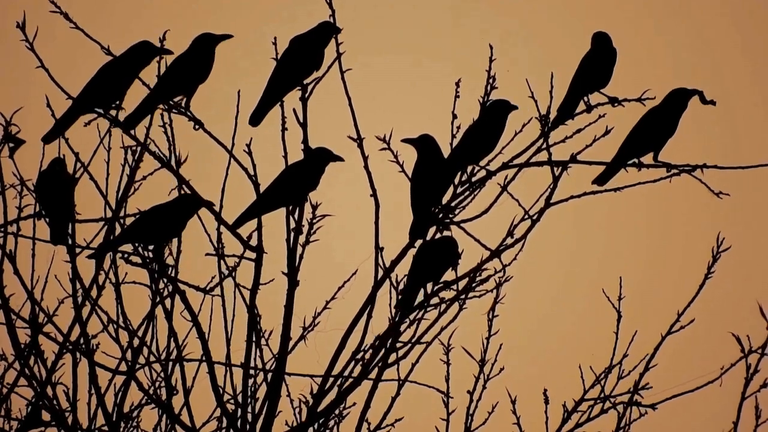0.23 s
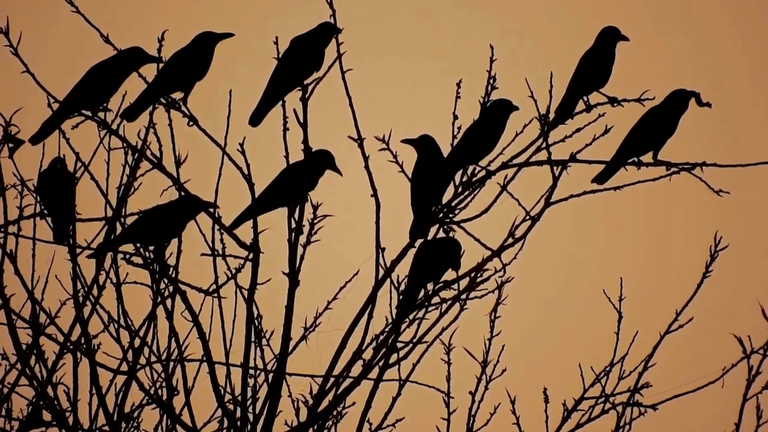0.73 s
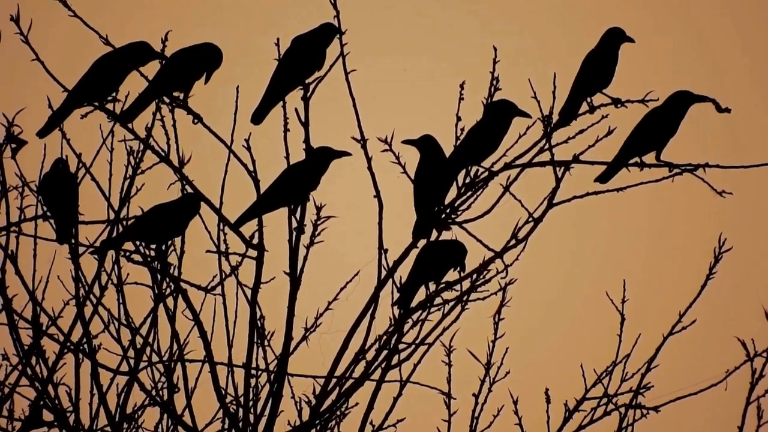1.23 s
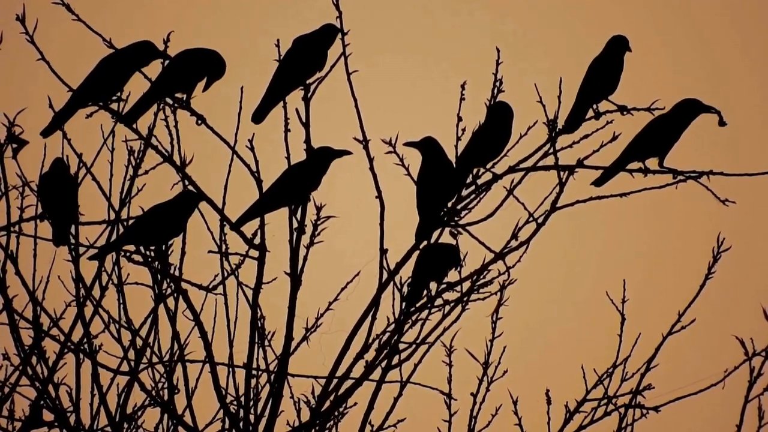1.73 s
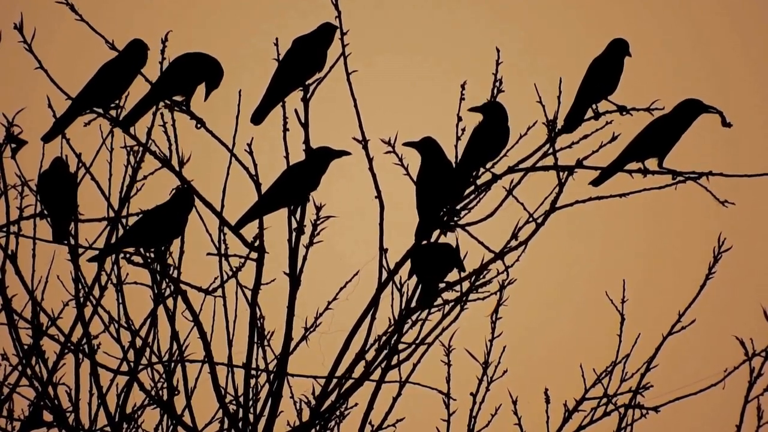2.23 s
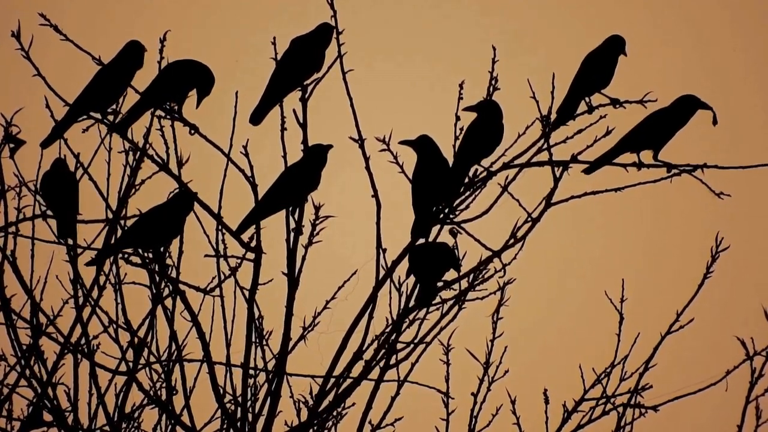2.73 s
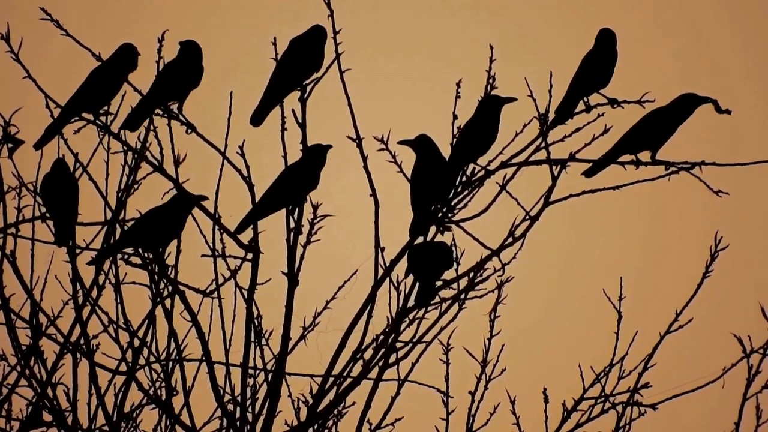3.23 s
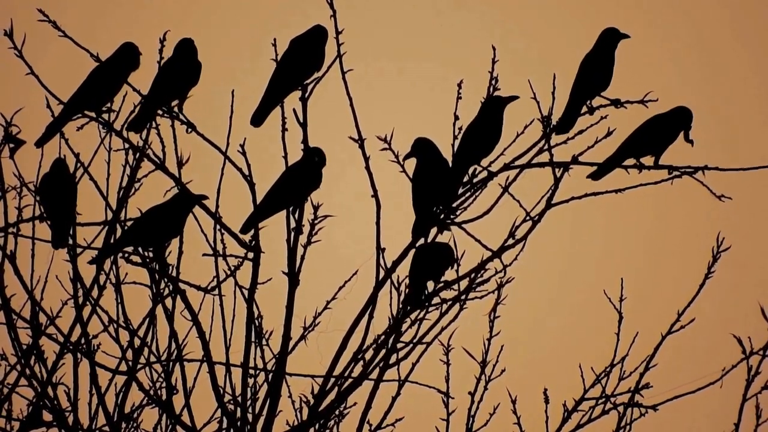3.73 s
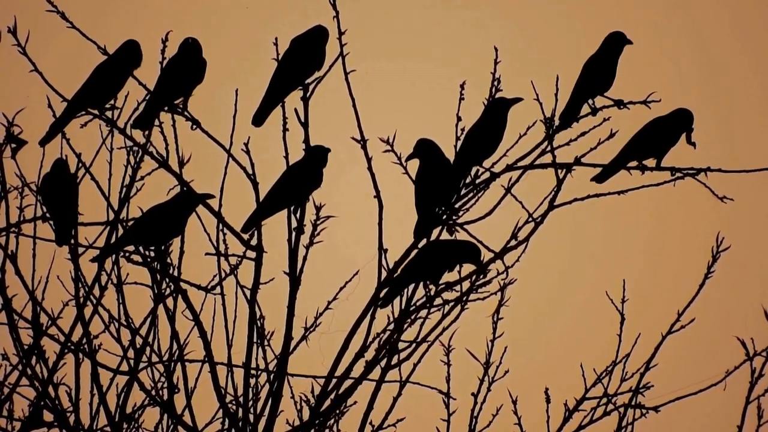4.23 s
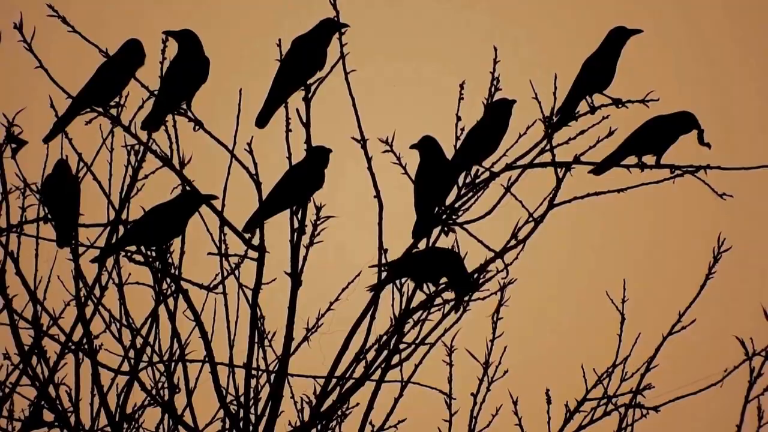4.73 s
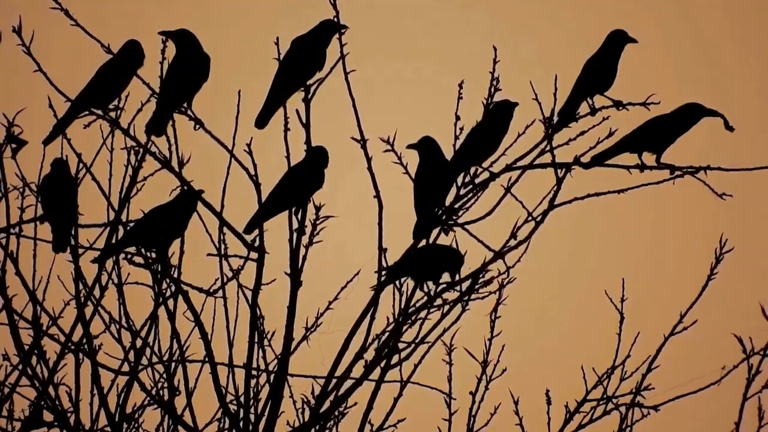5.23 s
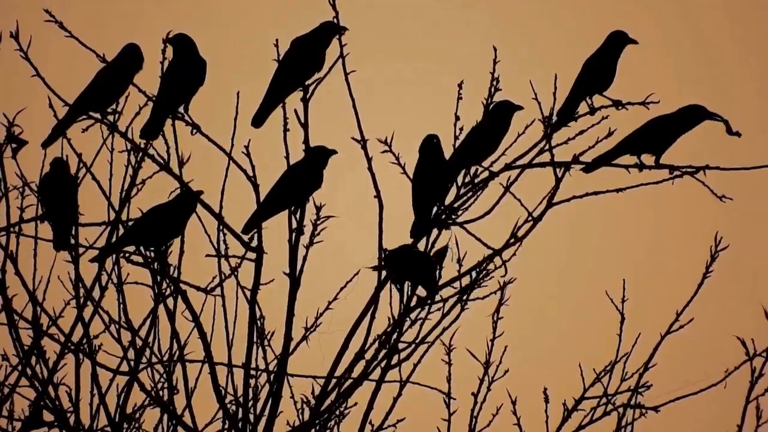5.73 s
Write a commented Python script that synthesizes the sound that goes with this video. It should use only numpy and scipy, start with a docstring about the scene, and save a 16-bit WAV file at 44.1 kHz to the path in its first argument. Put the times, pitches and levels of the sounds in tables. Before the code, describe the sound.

A flock of crows caws hoarsely in dense overlapping chorus outdoors, near calls over a babble of distant ones, with brief thin squeals midway.

```python
"""Among trees, a flock of crows caws: hoarse, overlapping near calls over a babble of far ones and a faint hiss.
Each caw is an uneven pulse train on an arched pitch, rung through a throat that opens and closes.
Two short, clear yelps cut in near the start, dry rattles click, and midway one bird gives thin gliding squeals.
The ground sends back one quick copy of the near calls; the trees answer with a short, dull echo."""
import sys
import numpy as np
from scipy import signal
from scipy.fft import rfft, irfft, next_fast_len
from scipy.io import wavfile
from scipy.ndimage import map_coordinates

SR = 44100
rng = np.random.default_rng(int(sys.argv[2]) if len(sys.argv) > 2 else 0)


def dump(signal):
    """Clip the signal to [-1, 1] and save it as 16-bit WAV at the path in sys.argv[1]."""
    limited = np.clip(np.atleast_2d(signal).T, -1, 1)
    pcm = np.round(limited * 32767).astype(np.int16)
    wavfile.write(sys.argv[1], SR, pcm)


N = 263718  # samples

# near caws: (start t/s, length t/s, level/dB before its course, pitch f/Hz before its arch, share of pitch lost,
# roughness 0-1, attack t/s, main resonance f/Hz, second resonance f/Hz, its ratio with the beak closed,
# its lift level/dB, high resonance f/Hz, its lift level/dB, treble level/dB)
NEAR_CAWS = [ (-.08, .33, -39, 375.2, .2, 0.46, .024, 1610, 3020, 0.87, 11.5, 6750, 5, 5.5),
             (.173, 0.18, -43, 340, 0.098, 0.32, 0.02, 1470, 2950, 1, 7, 6500, -2, -11),
             (.395, 0.047, -51, 350, 0.08, 0.5, 0.012, 1130, 3000, 1.1, 18.5, 6000, 4, -7),
             (0.577, 0.33, -35.5, 362, 0.057, 0.38, 0.047, 1565, 2990, 1.1, 14, 6430, 6.5, -2),
             (0.78, 0.26, -38.5, 408, 0.17, 0.39, 0.1, 1800, 3250, 0.63, 13.5, 6900, 6.5, -3),
             (0.928, .22, -41.5, 338.3, 0.19, 0.37, 0.013, 1400, 3000, 2.1, 10, 6500, 5, -2),
             (1.287, .25, -33.5, 400, .12, .42, 0.039, 1736, 3370, 1.13, 10.5, 6260, 4.5, 13),
             (1.5, .24, -40, 369, .17, 0.47, 0.034, 1585, 3167, .73, 6, 6550, 6, -1),
             (1.67, .22, -39.5, 401, .12, 0.49, 0.015, 1540, 3040, 1, 6, 6540, 7, -4),
             (1.83, 0.29, -40, 375.7, 0.14, 0.37, 0.009, 1400, 2900, 1.1, 6.5, 6450, 9.5, -4.5),
             (2.061, 0.22, -36, 394, 0.11, 0.46, .02, 1455, 2930, 1.06, 9, 6900, 12, -5),
             (2.18, .29, -40.5, 336.7, .18, 0.35, 0.018, 1480, 3100, 0.6, -12, 6550, 9, -2),
             (2.419, 0.27, -34.5, 369.4, .13, 0.49, 0.075, 1450, 3020, 0.78, 6, 6550, 6, 1),
             (2.556, 0.35, -36, 406, 0.2, .6, 0.041, 1810, 3240, 0.88, 6.5, 6900, 3, 6.5),
             (2.714, 0.43, -35.5, 372.6, .18, 0.51, .014, 1636, 3040, 0.97, 6.5, 6300, 7, 1),
             (2.959, 0.28, -38, 378.7, 0.17, .4, .04, 1550, 3020, 1.6, 10, 6600, -1, 3.5),
             (3.231, .19, -49.5, 344.6, 0.13, 0.23, 0.015, 1490, 2900, .92, -7, 6500, 0, 5),
             (3.42, 0.18, -43, 412, 0.057, 0.39, .015, 1344, 3060, .85, 11, 6400, 1, -10),
             (3.636, .15, -43.5, 401.7, 0.089, 0.34, 0.035, 1500, 3240, 0.87, 7, 6700, 0, -8),
             (3.718, 0.3, -40, 330.2, 0.15, 0.34, 0.0067, 1340, 3170, .95, 4, 6340, 7.5, -6),
             (3.962, .34, -40.5, 340.4, .14, .4, .035, 1440, 3370, 0.98, 9, 6500, 7, -1),
             (4.196, 0.26, -45, 331.6, 0.17, 0.44, 0.054, 1400, 3280, .7, 1, 6300, 7.5, -2),
             (4.423, 0.059, -51, 340, 0.094, 0.26, .012, 1200, 2740, 0.93, 22.5, 6100, 0, -9),
             (4.511, 0.034, -37.5, 332, 0.11, 0.39, 0.0074, 1330, 2930, 1.1, 5, 6500, 8, -9),
             (4.555, .2, -34, 353.3, .16, .4, .002, 1450, 2900, 1.1, 7.5, 6660, 11.5, -4.5),
             (4.997, 0.3, -42.5, 452.5, .18, 0.45, 0.023, 1600, 3220, 1.2, 11, 7030, 10.5, -0.5),
             (5.209, .22, -41.5, 424.3, 0.18, 0.44, 0.027, 1540, 2980, 1.03, 9.5, 7340, 7, 2),
             (5.475, 0.082, -50.5, 398, 0.055, 0.43, .008, 1950, 3300, 1.1, 7, 7100, -4, 4),
             (5.5, 0.36, -43.5, 391.7, 0.15, 0.54, 0.048, 1830, 3310, 1.14, 12, 7000, 1.5, 3),
             (5.656, 0.27, -43, 338.6, 0.11, 0.42, 0.008, 1400, 2940, 1.2, 11.5, 6450, 1, -9)]
# two short clear yelps: (start t/s, length t/s, level/dB before its course, pitch f/Hz before its bend,
# treble level/dB)
YELPS = [(0.115, 0.055, -35.5, 745, -9), (0.47, .088, -36, 747.4, -1)]
YELP_ROUGH, YELP_FALL, YELP_ATTACK_S = 0.12, 0.055, 0.014
# a yelp's throat: (second resonance f/Hz, its ratio with the beak closed, its lift level/dB,
# high resonance f/Hz, its lift level/dB)
YELP_THROAT = (2400, 1.5, -3, 6650, 18.5)
# the course of every caw: (share of its length, pitch ratio, relative level/dB, beak opening 0-1)
CALL_COURSE = [ (0, .86, -2, 0), (.1, .935, -.5, .45), (.32, 1.01, 0, 1), (.58, 1, 0, 1),
               (.82, .95, -2, .7), (1, .88, -5, .1)]
# colour of the voice beneath its resonances: (f/Hz, relative level/dB per Hz)
THROAT_COLOUR = [(200, -60.5), (330, -43), (520, -6.5), (720, -2), (1000, -2), (1400, 1.5), (2030, 3.5),
                 (2500, -5), (3250, -6.5), (3950, -15), (5400, -18), (7500, -19.5), (10500, -32),
                 (13500, -50)]
HIGH_CLOSED = 0.86  # ratio of the high resonance with the beak closed
# dry rattles, where a voice catches in single clicks: (start t/s, length t/s, level/dB before scatter and colour)
RATTLES = [(1.29, .035, -53), (2.416, .19, -58), (5.004, .012, -62)]
# tone of the rattle clicks: (f/Hz, level/dB)
RATTLE_COLOUR = [(400, -30), (800, -2), (1500, 6), (2500, 3), (4000, 0), (6000, 0.5), (9500, -4.5),
                 (13500, -18), (16000, -28)]
# squeals: (start t/s, length t/s, level/dB before its shake, first f/Hz, last f/Hz,
# bend of the glide (1 straight, more = late), lower octave relative level/dB before its fade)
SQUEALS = [ (3.048, 0.062, -50.5, 2400, 3073, 0.76, 15.5), (3.105, 0.12, -46, 3417, 3460, 0.82, 5.5),
           (3.204, .063, -46, 2927, 1865, 2.33, 10), (3.361, 0.027, -45.5, 2870, 2435, 0.31, -22),
           (3.437, 0.053, -43, 2030, 2117, 0.35, -25), (3.618, 0.063, -43, 1590, 1735, 1.85, -24),
           (3.655, 0.017, -40.5, 2120, 1900, .77, -21)]
# a squeal's lower octave fades out as it sinks from 1380 to 1100 Hz: (f/Hz, share)
LOWER_OCTAVE_FADE = [(1100, 0.028), (1380, 1)]
# swell of the far birds: (t/s, level/dB before the flock's overall lift)
FLOCK_LEVEL = [(0.0, -46.5), (0.33, -55), (.52, -52.5), (.7, -50.5), (1.01, -45.5), (1.18, -55),
               (1.5, -48.5), (1.65, -58.5), (1.9, -50.5), (2.83, -45), (3.3, -52.5), (3.6, -55),
               (3.8, -48.5), (4.33, -53.5), (4.53, -52), (4.75, -48.5), (4.95, -70.5), (5.08, -50),
               (5.47, -58), (5.73, -50), (5.93, -57), (5.98, -80)]
# echo among the trees, time to fall by 60 dB: (f/Hz, t/s)
TREE_DECAY = [(500, 1), (1500, 0.58), (3500, 0.63), (8000, 0.54), (14000, 0.61)]
# colour of the background hiss: (f/Hz, relative level/dB per Hz)
HISS_COLOUR = [(20, -32), (250, -18), (500, 1.5), (3000, 3.5), (8000, -3), (15500, -6)]
LOW_CUT_HZ, BAND_LIMIT_HZ = 396, 15708


def amp(db):
    """Decibels to gain."""
    return 10 ** (np.asarray(db) / 20)


def unit(x):
    """x at rms 1."""
    return x / np.sqrt(np.mean(x ** 2) + 1e-20)


def along(points, hz):
    """(Hz, value) points read on a log axis."""
    f, v = np.transpose(points)
    return np.interp(np.log(hz + 1), np.log(f + 1), v)


def curves(rows, at):
    """Each column after the first, read at the given places."""
    places, *columns = np.transpose(rows)
    return [np.interp(at, places, column) for column in columns]


def wobble(rate, size):
    """A smooth random curve, rate knots a second."""
    return map_coordinates(rng.standard_normal(1024), [np.arange(size) * rate / SR], mode="wrap")


def add(track, s, x):
    """Mix x into the track from time s, trimming what falls outside."""
    i = round(s * SR)
    part = x[max(-i, 0):max(len(track) - i, 0)]
    track[max(i, 0):max(i, 0) + len(part)] += part


def filtered(x, gain):
    """x times a gain that depends on frequency."""
    m = next_fast_len(N + SR // 2)
    return irfft(rfft(x, m) * gain(np.fft.rfftfreq(m, 1 / SR)), m)[:N]


def rung(x, colour_db, size=1024):
    """x through a causal filter with the given dB response."""
    cepstrum = irfft(np.log(amp(colour_db(np.fft.rfftfreq(size, 1 / SR))) + 1e-6))
    # folding the cepstrum onto positive time makes the filter minimum phase
    cepstrum[1:size // 2] *= 2
    cepstrum[size // 2 + 1:] = 0
    impulse = irfft(np.exp(rfft(cepstrum)))
    return signal.fftconvolve(x, impulse)[:len(x)]


def bump(hz, centre_hz, width_hz):
    """The bell shape of one resonance, 1 at its centre."""
    return np.exp(-.5 * ((hz - centre_hz) / width_hz) ** 2)


def near_crows():
    """The closest birds, each caw with its own throat; a yelp rings the throat at its second harmonic."""
    out = np.zeros(N)
    for s, length, db, *voice in NEAR_CAWS:
        add(out, s, amp(db) * caw(length, *voice))
    for s, length, db, pitch_hz, treble_db in YELPS:
        yelp = caw(length, pitch_hz, YELP_FALL, YELP_ROUGH, YELP_ATTACK_S, 2 * pitch_hz,
                   *YELP_THROAT, treble_db, closed=.98)
        add(out, s, amp(db) * yelp)
    return out


def caw(length, pitch_hz, fall, rough, attack_s, main_hz, second_hz, second_closed, second_db,
        high_hz, high_db, treble_db, main_db=16, clear_db=16, main_width_hz=290, second_width_hz=215,
        high_width_hz=400, closed=0.88, waver=0.0199, onset_db=12, count=7):
    """One call: the throat's three resonances move as the beak opens."""
    size = int(max(length, .025) * SR)
    u = np.linspace(0, 1, size)
    bend, level_db, opening = curves(CALL_COURSE, u)
    opening, rough = np.clip(opening, 0, 1), np.clip(rough, 0, 1)
    level_db = level_db - onset_db * np.maximum(1 - u * length / max(attack_s, .001), 0)

    # hoarse calls arch and drop away, clear ones just sink
    arch = bend ** min((4 * rough) ** 2, 1)
    sink = 1 - fall * (u - .5)
    pitch = pitch_hz * arch * sink * (1 + waver * rough * wobble(79.4, size))
    source = syrinx(pitch, rough, opening)

    # a clear call pours its strength into the main resonance
    lift_db = main_db + clear_db * np.exp(-7 * rough)

    def throat(hz):
        """Broad voice colour, brightness and the main resonance, in dB."""
        brightness = along([(2200, 0.0011), (5000, treble_db)], hz)
        return along(THROAT_COLOUR, hz) + brightness + lift_db * bump(hz, main_hz, main_width_hz)

    # crossfade between a few fixed beak openings
    voice = np.zeros(size)
    for gape in np.linspace(0, 1, count):
        share = np.maximum(1 - abs(opening - gape) * (count - 1), 0)
        shift, second_shift, high_shift = (
            ratio + (1 - ratio) * gape for ratio in (closed, second_closed, HIGH_CLOSED))

        def colour_db(hz):
            """The whole throat at this opening, in dB."""
            second = second_db * bump(hz, second_hz * second_shift, second_width_hz)
            high = high_db * bump(hz, high_hz * high_shift, high_width_hz)
            return throat(hz / shift) + second + high

        voice += share * rung(source, colour_db)
    return branches(unit(voice) * amp(level_db) * signal.windows.tukey(size, .015))


def syrinx(pitch, rough, opening, jitter=0.11, scatter_db=3, doubling=0.71, closing=.3, slip=.13,
           rasp_hz=68, rasp_db=5, breath=.6):
    """Uneven pulses at the pitch, each with a puff of air."""
    size = len(pitch)
    cycles = np.cumsum(pitch) / SR
    n = np.arange(1, int(cycles[-1]))
    chance = rng.standard_normal((512, 2))[n]
    at = np.interp(n + jitter * rough * chance[:, 0], cycles, np.arange(size))

    # every second pulse weakens, most of all as the call starts and ends; now and then the pattern slips
    shut = 1 - np.interp(at, np.arange(size), opening)
    weak = np.clip(doubling * np.sqrt(rough) + closing * shut, 0, .95)
    beat = n + np.cumsum(rng.random(size=512)[n] < slip * rough)
    strength = amp(scatter_db * rough * np.tanh(chance[:, 1])) * (1 - weak * (beat % 2))

    # windowed sinc pulses land between samples
    taps = at.astype(int)[:, None] + np.arange(-7, 9)
    offset = taps - at[:, None]
    shape = np.sinc(offset) * np.sinc(offset / 8)
    places = np.clip(taps, 0, size - 1).ravel()
    pulses = np.bincount(places, (strength[:, None] * shape).ravel(), size)
    air = rng.standard_normal(size) * np.exp(-3 * (cycles % 1))

    # a slower flutter of the membranes makes the rasp
    flutter_hz = rasp_hz * np.exp(0.246 * wobble(30, size))
    flutter = np.sin(2 * np.pi * np.cumsum(flutter_hz) / SR)
    return (unit(pulses) + breath * rough * unit(air)) * amp(rasp_db * rough * flutter)


def branches(x, count=70, spread=.013, level_db=-3):
    """The direct sound and quick scattered reflections from around the perch, at unchanged energy."""
    lag = rng.uniform(.0006, .001 + spread, count)
    size = rng.standard_normal(count)
    out = np.pad(x, (0, SR // 10))
    for s, gain in zip(lag, amp(level_db) * size / np.linalg.norm(size)):
        add(out, s, gain * x)
    return out * np.linalg.norm(x) / np.linalg.norm(out)


def rattles(rate_hz=112, uneven=.25, scatter_db=1.5):
    """Slow, uneven clicks of the syrinx, brighter than the full voice."""
    clicks = np.zeros(N)
    for s, length, db in RATTLES:
        gap, size = rng.standard_normal((2, 40))
        at = np.append(0, np.cumsum(np.exp(uneven * gap[1:]))) / rate_hz
        for t, click_db in zip(at[at < length], db + scatter_db * size):
            # sparse clicks need height to carry the level of a steady sound
            add(clicks, s + t, amp([click_db]) * np.sqrt(SR / rate_hz))
    return branches(rung(clicks, lambda hz: along(RATTLE_COLOUR, hz)), level_db=-9)[:N]


def squeals(waver=.019, shake_db=3.2):
    """Thin, shaky gliding whistles, some with the octave below."""
    out = np.zeros(N)
    for s, length, db, first_hz, last_hz, bend, lower_db in SQUEALS:
        size = int(length * SR)
        hz = first_hz + (last_hz - first_hz) * np.linspace(0, 1, size) ** abs(bend)
        phase = 2 * np.pi * np.cumsum(hz * (1 + waver * wobble(258, size))) / SR
        lower = amp(lower_db) * along(LOWER_OCTAVE_FADE, hz / 2) * np.sin(phase / 2)
        tone = np.sqrt(2) * (np.sin(phase) + lower)
        level = amp(db + shake_db * wobble(101.4, size))
        add(out, s, tone * level * signal.windows.tukey(size, .12))
    return out


def ground(x, delay_s=.004, level_db=-15):
    """The ground sends back one quick copy."""
    out = x.copy()
    add(out, delay_s, amp(level_db) * x)
    return out


def far_crows(count=56, pitch_hz=345, length=.27, fall=.19, rough=.36, attack_s=0.022, main_hz=1420,
              second_hz=3000, second_closed=1.0, second_db=4, high_hz=6500, high_db=4, treble_db=-4,
              body_db=3, level_db=10):
    """Many duller voices, each with its own pitch and throat."""
    out = np.zeros(N)
    starts = np.linspace(-.2, N / SR, count)
    for s, (late, long, high, small) in zip(starts, rng.uniform(-1, 1, (count, 4))):
        k = 1 + .07 * small  # a smaller throat rings higher
        call = caw(length * (1 + .195 * long), pitch_hz * (1 + .2 * high), fall, rough, attack_s,
                   k * main_hz, k * second_hz, second_closed, second_db, high_hz, high_db, treble_db, count=3)
        add(out, s + .03 * late, call)
    # distance favours the low harmonics
    out = filtered(out, lambda hz: amp(along([(750, body_db), (1200, 0.0061)], hz)))
    flock_db, = curves(FLOCK_LEVEL, np.arange(N) / SR)
    return unit(out) * amp(flock_db + level_db)


def trees(x, delay_s=.015):
    """Scattered echoes from trunks and ground: noise whose decay time depends on frequency."""
    hz, t, z = signal.stft(rng.standard_normal(SR), SR, nperseg=256)
    decay = amp(-60 * t / along(TREE_DECAY, hz)[:, None])
    tail = signal.istft(z * decay, SR, nperseg=256)[1]
    out = np.zeros(N)
    add(out, delay_s, signal.fftconvolve(x, tail / np.linalg.norm(tail)))
    return out


def hiss(level_db=-68.5):
    """A faint steady background of coloured noise."""
    noise = filtered(rng.standard_normal(N), lambda hz: amp(along(HISS_COLOUR, hz)))
    return amp(level_db) * unit(noise)


def scene(echo_db=-8):
    """All the birds, their echo and the hiss."""
    birds = ground(near_crows() + rattles()) + far_crows() + squeals()
    return (birds + amp(echo_db) * trees(birds) + hiss())[None]


def record(dry):
    """A low cut thins the bottom; nothing passes above the band limit."""
    def gain(hz):
        return (hz < BAND_LIMIT_HZ) / np.sqrt(1 + (LOW_CUT_HZ / (hz + 1)) ** 10)
    return filtered(dry[0], gain)[None]


dry = scene()
out = record(dry)
dump(out)
```